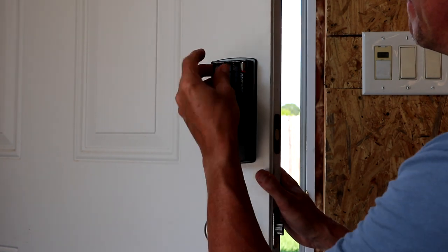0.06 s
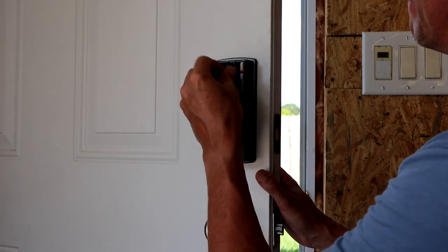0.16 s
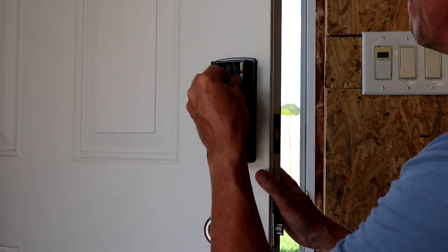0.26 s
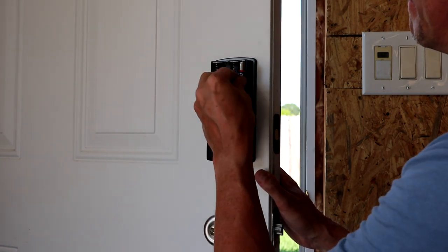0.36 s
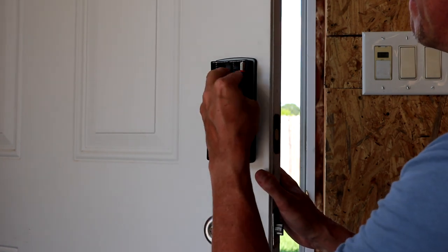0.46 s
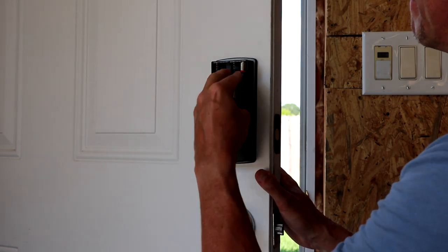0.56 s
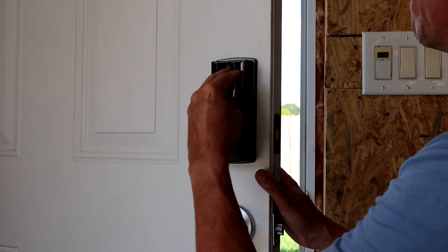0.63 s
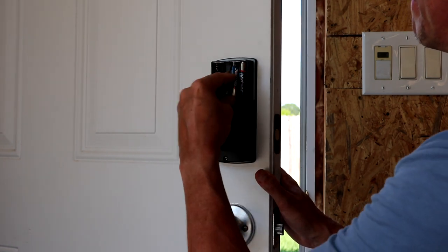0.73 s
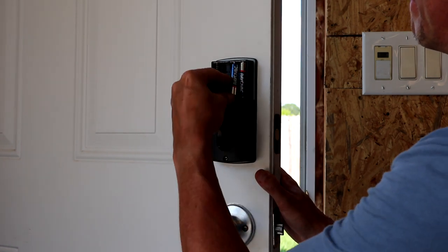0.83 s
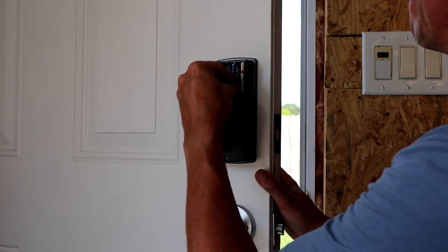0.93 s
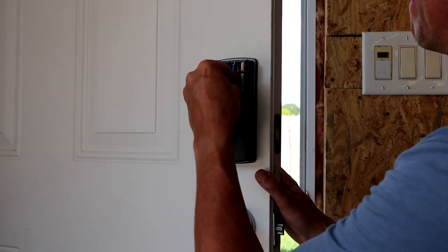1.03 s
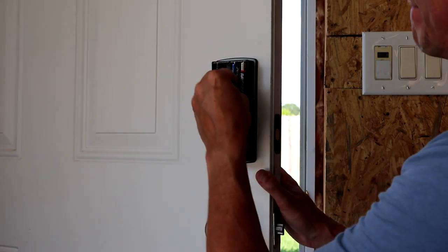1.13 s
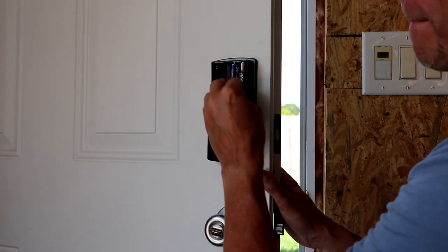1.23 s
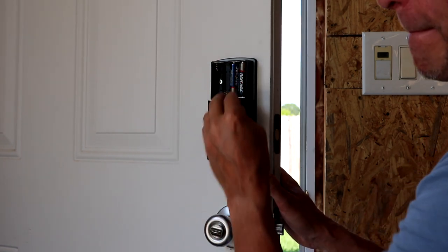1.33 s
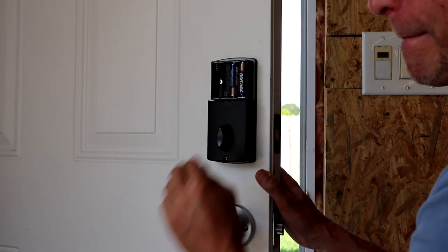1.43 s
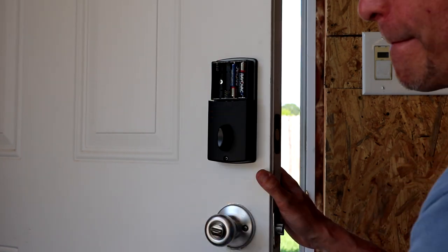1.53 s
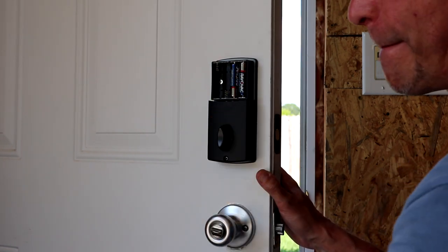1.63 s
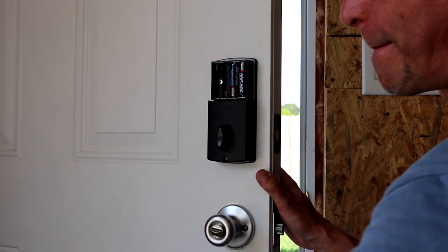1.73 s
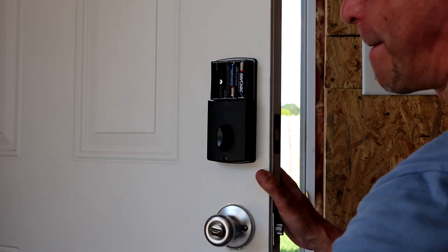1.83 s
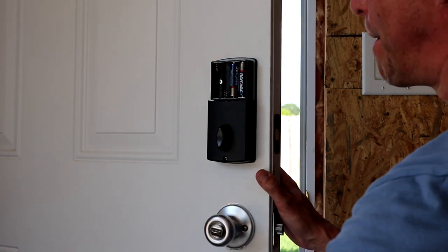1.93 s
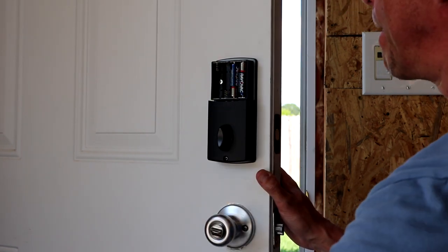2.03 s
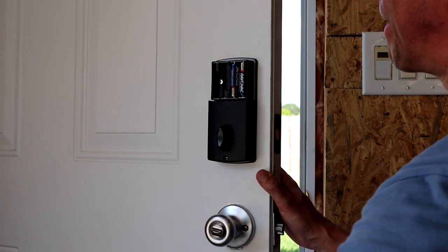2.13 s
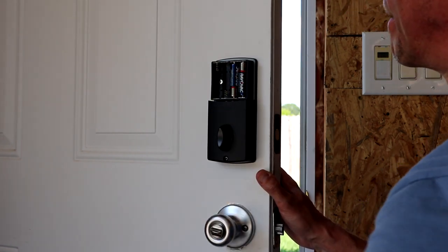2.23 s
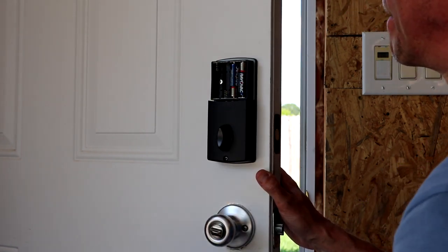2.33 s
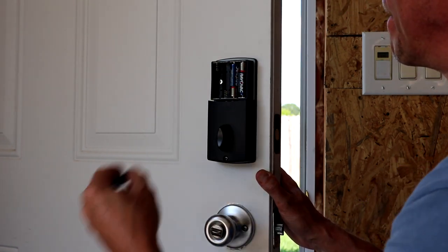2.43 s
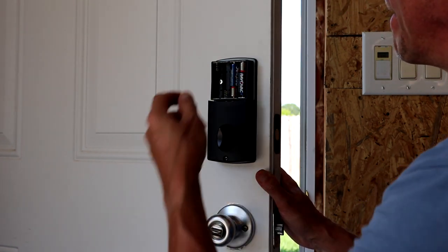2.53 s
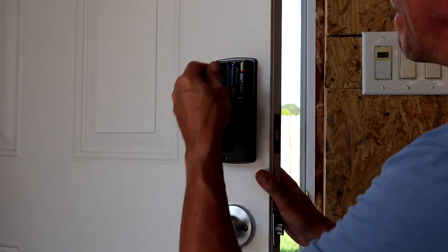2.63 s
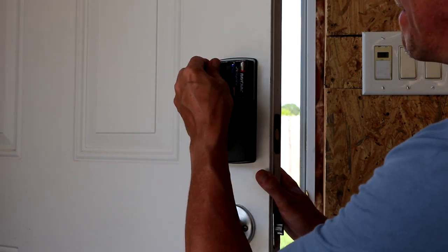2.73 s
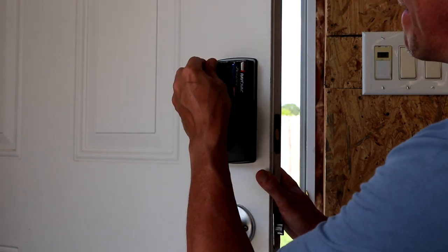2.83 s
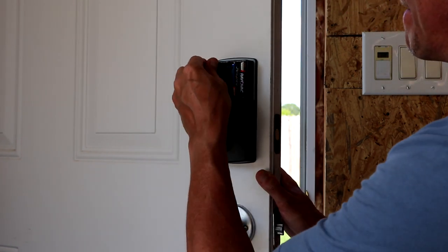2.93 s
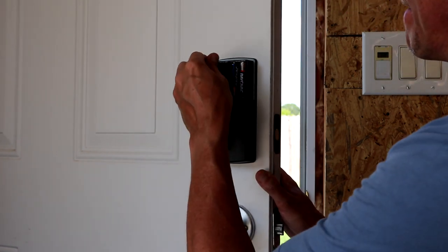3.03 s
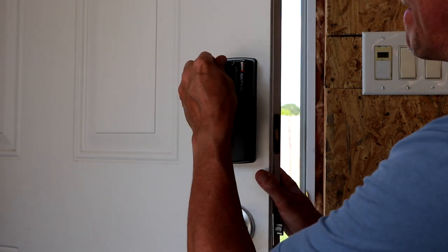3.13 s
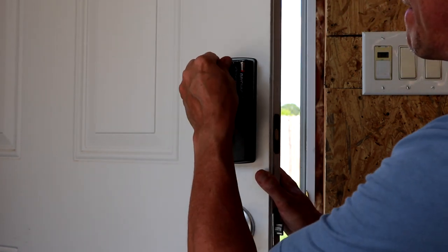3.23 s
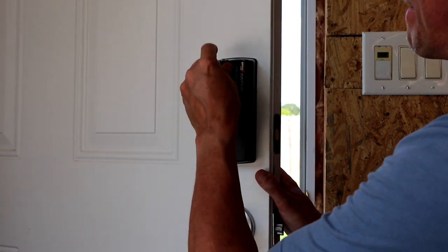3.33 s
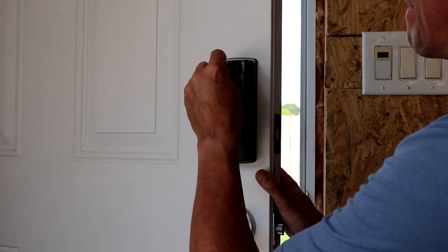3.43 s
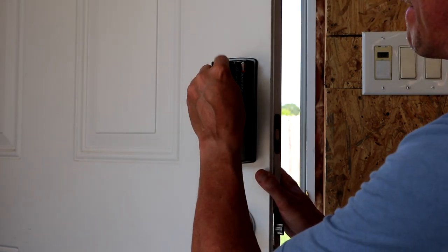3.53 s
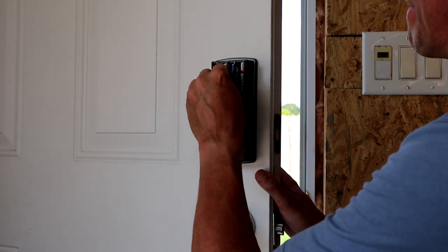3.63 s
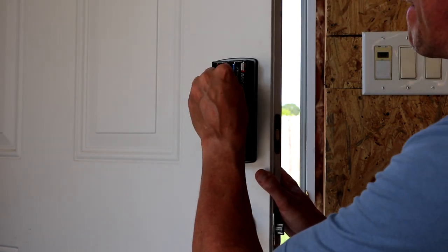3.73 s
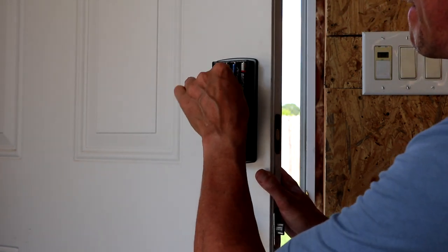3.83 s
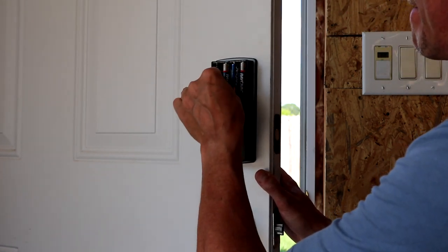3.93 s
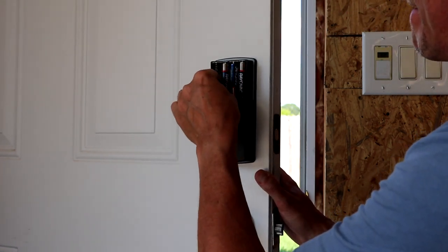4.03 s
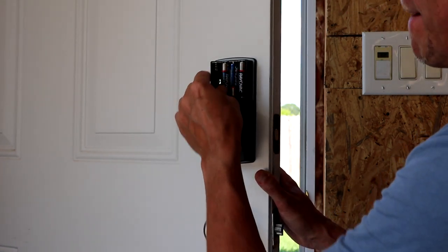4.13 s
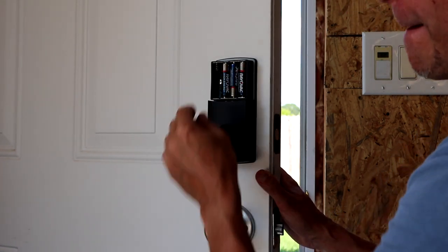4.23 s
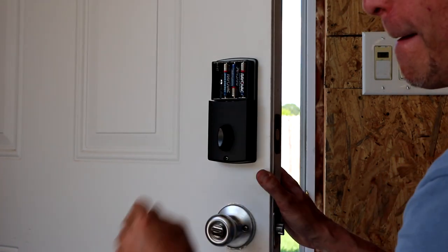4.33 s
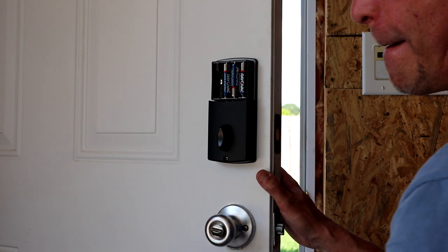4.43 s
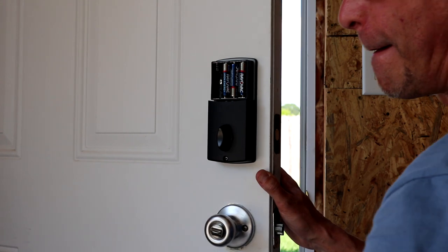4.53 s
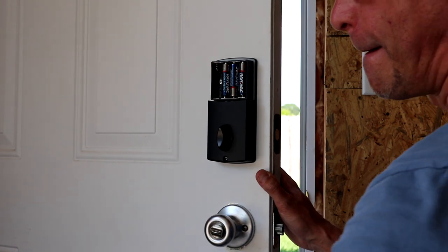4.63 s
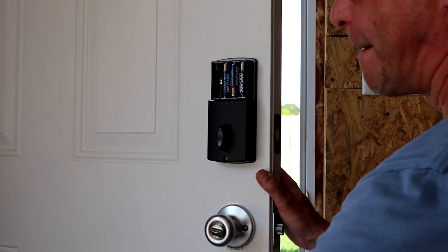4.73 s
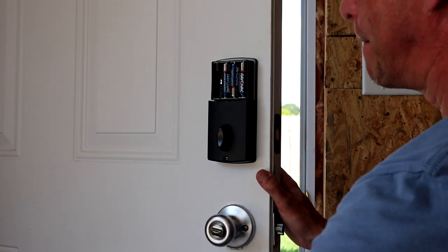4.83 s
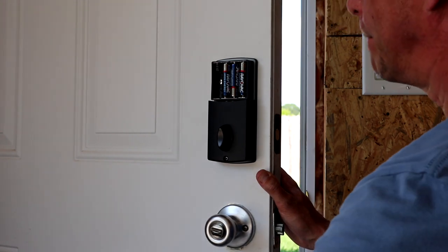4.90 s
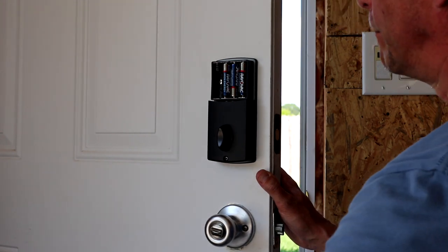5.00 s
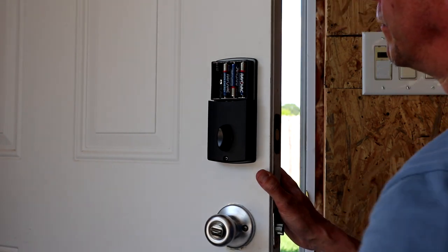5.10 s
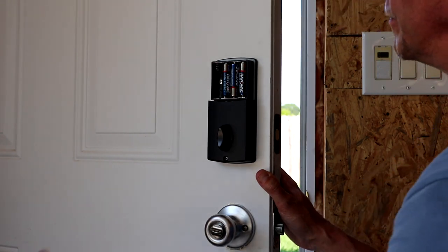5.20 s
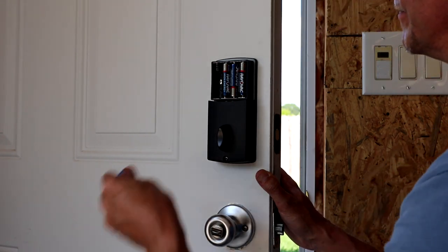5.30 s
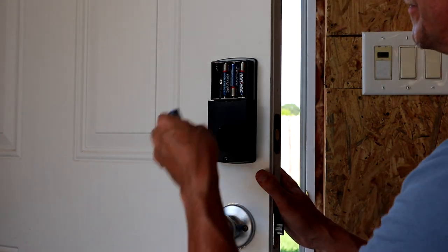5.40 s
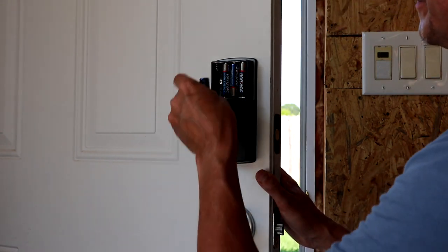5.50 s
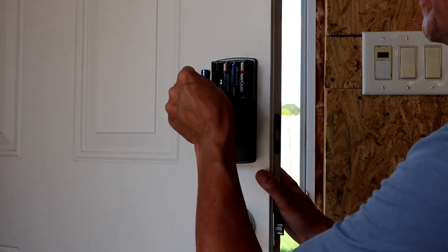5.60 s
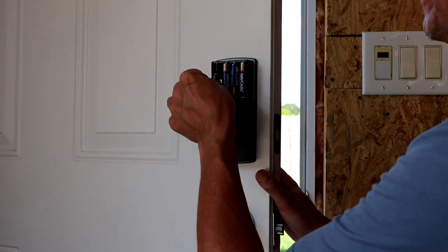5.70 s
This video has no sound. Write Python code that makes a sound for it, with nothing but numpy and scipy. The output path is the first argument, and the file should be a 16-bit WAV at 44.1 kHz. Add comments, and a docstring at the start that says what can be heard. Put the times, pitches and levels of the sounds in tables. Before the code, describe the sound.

Close, irregular clicks and clacks come from batteries being pushed into a lock's plastic housing, each knocking lightly through the door. Early on, one scrapes a contact spring and leaves a thin ring. After a few sparse taps, another snaps in with a quick flurry. Behind this are the small room's steady noise, a faint motor whine and outdoor insects, with soft birdsong and a far engine hum growing later.

```python
"""At a door standing ajar in a small room, batteries are pressed into a lock's plastic compartment.
Each impact excites the modes of housing and door, a clack and a thud, and the metal ends tick.
One battery rasps over a contact spring by stick-slip friction, and the spring rings on.
Hands bump, rub and push the door. Behind them are birds and insects outside,
a small motor's whine, a distant engine's hum and room noise."""
import sys
import numpy as np
from scipy import signal
from scipy.fft import rfft, irfft
from scipy.io import wavfile
from scipy.ndimage import uniform_filter1d

SR = 44100
rng = np.random.default_rng(int(sys.argv[2]) if len(sys.argv) > 2 else 0)


def int16_out(signal):
    """Quantize to a 16-bit WAV file."""
    q = np.round(np.clip(np.atleast_2d(signal).T, -1, 1) * 32767)
    wavfile.write(sys.argv[1], SR, q.astype(np.int16))


N = 254016

# Battery impacts; the point of contact favours the housing modes near two pitches:
# start_s, thud_db, door_t60_ratio, relative_clack_db, favoured_low_hz, favoured_high_hz, favour_db
IMPACTS = [(0.4546, -40, 0.45, -28, 1710, 3050, 10), (0.4571, -41, 0.43, -35, 1520, 1715, 12),
           (0.464, -53, .4, -35, 1715, 1770, 15), (0.486, -40.5, .5, -42, 1450, 1710, 7),
           (0.9265, -43, .5, -33.5, 1720, 1770, 11), (0.9508, -27, 0.82, -25.5, 1500, 2230, 3.9),
           (0.9565, -40, .6, -35, 2980, 3400, 7), (0.9742, -44, .6, -47, 2000, 3400, 5),
           (0.9836, -26, 0.78, -26.5, 1500, 2980, 5), (0.995, -49, .4, -34, 2950, 3030, 13),
           (1.0318, -43, .6, -32, 3010, 3320, 9), (2.0504, -39.5, .5, -41, 1900, 2350, 11),
           (2.0579, -51, .5, -34, 2330, 2400, 18), (2.8135, -34, 0.81, -34, 1950, 2190, 9.8),
           (3.203, -38.5, 0.6, -53, 1440, 1900, 6), (3.414, -45, .5, -37, 1720, 3000, 4),
           (3.4751, -42.5, .5, -33, 1440, 1530, 7.6), (3.479, -44, .4, -36, 1440, 1950, 5.6),
           (3.587, -43, .4, -39.5, 1440, 1550, 7), (3.6163, -33.5, 0.77, -28.5, 2230, 3700, 7.3),
           (3.620, -28, 0.55, -31, 1440, 2140, 6.8), (3.6245, -33, 0.6, -34, 2310, 3300, 5),
           (3.638, -36.5, 0.39, -44, 3320, 3750, 9)]
# Metal ends catching on contacts: start_s, level_db, pitch_hz, decay_s
CONTACT_TICKS = [(0.455, -44.5, 6400, .0009), (0.8738, -46, 9400, .0013), (0.9508, -24, 6500, 0.00046),
                 (0.9738, -45, 9800, .0008), (0.9836, -29.5, 6530, .0006), (1.034, -42, 6600, .001),
                 (2.8133, -47, 6500, .001), (3.208, -54, 8400, .004), (3.4751, -46, 7200, .0014),
                 (3.5592, -42, 7300, .0009), (3.6055, -41, 8900, .0007), (3.6163, -34, 7250, 0.00053),
                 (3.622, -46, 5800, .003), (3.6415, -46, 5700, .0012), (3.8977, -41.5, 6600, .0007),
                 (4.2851, -46, 7940, .004)]
# Modes of the door, the housing and the spring: frequency_hz, relative_db, t60_s
DOOR_MODES = [(146, -10, 0.13), (207, -17.5, 0.15), (346, -5.5, 0.091), (393, -8, 0.09), (486, -4.5, 0.17),
              (563, -4, 0.092), (714, 2.5, 0.036), (848, -1.5, 0.031), (1000, 1.5, 0.044), (1039, 1, 0.05),
              (1155, 0, 0.029)]
HOUSING_MODES = [(1440, -1, 0.019), (1560, -5.5, 0.029), (1706, -2, 0.035), (1978, -1.5, 0.032),
                 (2170, -3, 0.031), (2286, -3.5, 0.028), (2444, -9.5, 0.04), (2735, -5.5, 0.027),
                 (2900, -3.5, 0.03), (3020, -7, 0.027), (3320, -5, 0.024), (3420, -9.5, 0.031),
                 (3745, -14, 0.035)]
SPRING_MODES = [(1810, -12.5, 0.14), (1970, -19, .15), (2360, -27, 0.13), (2595, -20, .2),
                (2990, -9.5, 0.06), (3130, -14, .09), (3380, -15, 0.064), (3690, -20.5, 1.5),
                (3850, -14.5, .08), (6380, -19.5, 0.2), (6470, -29, 2.0), (6780, -30.5, 1.7),
                (7750, -29, .35), (8220, -28, 0.6), (8570, -29.5, 1.14)]
# Spectra of a tick and of the rasp on the coil: frequency_hz, gain_db
TICK_SPECTRUM = [(2500, -20), (4600, -15), (6000, -1.5), (8500, -9), (10000, -11.5), (12000, -24),
                 (15500, -40)]
RASP_SPECTRUM = [(200, 1), (1000, -6), (2500, 0.5), (3100, 8.5), (3850, -1), (4500, -14), (5700, -8),
                 (6500, -5), (8600, -9), (10000, -16), (15500, -30)]
# Soft bumps of a hand on the door: start_s, relative_db, pitch_hz
HAND_BUMPS = [(1.970, -35.5, 245), (5.0455, -33, 195), (5.075, -40, 504)]
# Hand and battery rubbing on plastic: start_s, rise_s, decay_s, level_db, pitch_hz
PLASTIC_RUBS = [(2.036, 0.016, 0.0091, -42, 2300), (2.044, 0.019, .012, -56, 3930),
                (3.572, 0.014, 0.0032, -36, 1360), (3.62, 0.0062, 0.062, -46, 3620)]
# The door giving under a firm push: start_s, level_db
DOOR_PUSHES = [(0.469, -43), (3.579, -38.5)]
# First bird, a whistle that scoops up and sags: start_s, level_db, top_pitch_hz
BIRD_WHISTLES = [(-.05, -48, 2654), (4.235, -50.5, 2675), (4.525, -48, 2640), (4.814, -46, 2644)]
# Second bird, a steep chip and a settling peep: start_s, chip_db, peep_delay_s, peep_db, peep_hz
BIRD_CALLS = [(4.726, -68, .065, -50.5, 3820), (4.959, -62.5, 0.125, -50, 3810),
              (5.201, -63, 0.078, -50, 3842), (5.449, -65, 0.079, -52, 3845)]
# Third bird, rising notes, buzzy or pure: start_s, length_s, level_db, pitch_hz, buzz_depth_hz
BIRD_BUZZES = [(3.93, 0.14, -50, 3200, 94), (4.103, 0.28, -56, 3240, 98), (4.25, 0.2, -56.5, 3165, 14),
               (4.4, 0.066, -51, 3194, 10), (4.412, 0.228, -56, 3340, 24), (4.469, 0.26, -59.5, 3386, 90)]
# Thin, high bird notes: start_s, level_db, pitch_hz
BIRD_THIN_NOTES = [(3.345, -67.5, 5440), (3.81, -63.5, 5450), (5.715, -63.5, 6330)]
# Bands of the motor and of a far insect chorus: centre_hz, width_hz, above_room_noise_db
MOTOR_BANDS = [(490.6, 4.2, 2.5), (515, 11, 0.5), (1056, 3.9, 4), (1722, 3.3, 20.5), (1748, 8.7, 15),
               (1772, 4.4, 17), (1920, 7.5, 10), (1946, 6, 12), (2021, 37, 8.5), (2075, 8.9, 13.5),
               (2074, 45, 6.5), (2340, 5.8, 12.5), (3010, 78, 5.5)]
INSECT_BANDS = [(9720, 690, 18.5), (11920, 840, 7)]
# Harmonics of the distant engine: time_s, firing_db, octave_db
ENGINE_LEVELS = [(0.3, -64, -71), (1.85, -53, -63), (3.95, -54, -51), (4.56, -46.5, -64),
                 (4.85, -46.5, -60), (5.25, -42, -53), (5.316, -43, -55), (5.68, -47, -53)]
# Spectral density of the room noise: frequency_hz, density_db_per_hz
ROOM_NOISE = [(14, -93), (27, -67), (39, -71.5), (56, -62), (85, -70.5), (400, -76), (900, -76.5),
              (1400, -81.5), (1950, -77.5), (2500, -85.5), (4000, -91), (5400, -99), (6600, -111),
              (8500, -117), (11000, -118), (15000, -135)]
# Reverberation times indoors and outdoors: frequency_hz, t60_s
ROOM_DECAY = [(150, 0.79), (600, 0.18), (3000, 0.5), (7000, 0.21), (14000, 0.21)]
YARD_DECAY = [(2500, 0.44), (3800, 0.66), (5500, 0.5), (7000, 0.57)]
# Likeness of the noise at the left and right microphone ports: frequency_hz, coherence_ratio
PORT_COHERENCE = [(60, .999), (130, 0.98), (290, 0.91), (640, 0.91), (1410, 0.38), (1750, 0.41),
                  (2100, 0.23), (4000, 0.9), (7000, 1)]
# Level balance of the ports: frequency_hz, left_minus_right_db
PORT_BALANCE = [(200, 0), (380, -1), (700, 3.5), (1300, 1.5), (1800, 7), (2400, 3), (4400, 0.5), (8000, 0)]
# Phase between the ports: frequency_hz, left_lead_rad
PORT_PHASE = [(60, 0), (500, 0.44), (1290, -0.36), (1750, 0.56), (2070, 1.86), (2330, .5), (3010, 2.5),
              (4500, 2.5)]


def batteries(rebound_s=0.016):
    """Inelastic collision: each battery strikes and rebounds once, more weakly; its metal ends tick."""
    out = np.zeros((2, N))
    for start, thud_db, t60_ratio, clack_db, *favoured_hz, favour_db in IMPACTS:
        add(out, start, impact(thud_db, t60_ratio, clack_db, favoured_hz, favour_db))
        add(out, start + rebound_s, impact(thud_db - 13.5, t60_ratio, clack_db - 15, favoured_hz, favour_db))
    for start, db, hz, decay in CONTACT_TICKS:
        add(out, start, tick(db, hz, decay))
    return out


def impact(thud_db, t60_ratio, clack_db, favoured_hz, favour_db):
    """Impulse excitation: the light housing clacks in short, high modes; the heavier door thuds."""
    t = np.arange(SR // 4) / SR
    grit = diffuse(rng.standard_normal((2, len(t)))) * np.exp(-t / 0.0052)
    dense_modes = colour(grit, [(300, -15.5), (1200, 4.5), (2200, -3), (3600, -8), (4600, -15),
                                (10000, -44), (15500, -64)])
    housing_modes = []
    for hz, db, t60 in HOUSING_MODES:
        nearness = np.exp(-(np.log(hz / np.array(favoured_hz)) / 0.086) ** 2).max()
        housing_modes.append((hz, db + favour_db * nearness, t60))
    housing = ring(housing_modes, t, spread_db=1.3, apart_hz=5000) * (1 - np.exp(-(t / 0.00041) ** 2))
    clack = with_energy(housing, 0.0081) + amp(-4.5) * with_energy(dense_modes, 0.006)
    door_modes = [(hz, db, t60 * t60_ratio) for hz, db, t60 in DOOR_MODES]  # a firm grip damps the door
    door = ring(door_modes, t, spread_db=2.5, apart_hz=4000) * (1 - np.exp(-t / 0.0013))
    return amp(thud_db) * with_energy(door, 0.0081) + amp(clack_db - 2.5) * clack


def ring(modes, t, spread_db, apart_hz):
    """Modal superposition: damped sinusoids whose strengths vary with the point of contact."""
    hz, db, t60 = np.transpose(modes)[:, :, None]
    strength, detune, skew, sign = rng.standard_normal((4, len(modes), 1))
    # high modes reach the two ports out of step
    phase = skew * np.minimum(hz / apart_hz, 1.2) * np.array([1, -1])[:, None, None]
    waves = np.sign(sign) * np.sin(2 * np.pi * hz * (1 + 0.0038 * detune) * t + phase)
    return (waves * amp(db + spread_db * strength - 60 * t / t60)).sum(1)


def tick(level_db, pitch_hz, decay_s, half_width_hz=600, after_ring_s=0.013):
    """Resonance: metal catching on a contact gives a gritty snap with a pitch of its own."""
    t = np.arange(SR // 10) / SR
    grit = diffuse(rng.standard_normal((2, len(t))), split_hz=3800)
    envelope = np.exp(-t / decay_s) + amp(-20) * np.exp(-t / after_ring_s)
    hz = np.fft.rfftfreq(512, 1 / SR)
    resonance_db = 9 / (1 + ((hz - pitch_hz) / half_width_hz) ** 2)
    spectrum = np.transpose([hz, read(TICK_SPECTRUM, hz) + resonance_db])
    return amp(level_db) * with_energy(colour(grit * envelope, spectrum), 0.00048)


def spring(start_s=1.0305, slide_s=0.026, attack_s=0.0025, release_db_per_s=800):
    """Stick-slip friction: a battery rasps over the coil and drives its modes, which ring on."""
    chatter_hz, chatter_db, slips_per_s = 450, 3.5, 4000
    t = np.arange(N) / SR
    since = t - start_s
    force = np.clip(since / attack_s, 0, 1) * amp(-release_db_per_s * np.clip(since - slide_s, 0, 1))
    catches = np.arange(0, t[-1], 1 / chatter_hz)  # the battery catches on the turns of the coil
    force *= amp(chatter_db * np.interp(t, catches, rng.standard_normal(N)[:len(catches)]))
    slips = rng.choice([-1, 1], (2, N)) * (rng.random(N) < slips_per_s / SR)
    rasp = unit_rms(colour(diffuse(slips, split_hz=2800), RASP_SPECTRUM)) * force
    wire = np.zeros((2, N))
    noise = rfft(rng.standard_normal((2, N)))
    bin_hz = np.fft.rfftfreq(N, 1 / SR)
    for (hz, db, t60), skew in zip(SPRING_MODES, rng.uniform(-1.3, 1, len(SPRING_MODES))):
        driven = force * unit_rms(np.sin(2 * np.pi * hz * t + 1.1 * skew * np.array([[1], [-1]])))
        retention = amp(-60 / (t60 * SR)) ** 2
        energy = signal.lfilter([1], [1, -retention], force ** 2 + 1e-30)  # slips pile up in the mode
        half_width_hz = 34 * (hz / 3000) ** 2  # left to itself, each mode rings as a close cluster
        cluster = 1 / (1 + ((bin_hz - hz) / half_width_hz) ** 4)
        shimmer = np.sqrt(energy / energy.max()) * unit_rms(irfft(noise * cluster))
        wire += amp(db) * (driven + amp(-3) * shimmer)
    return amp(-28.5) * (amp(-6) * rasp + amp(-2.5) * wire)


def hands():
    """Soft impact and friction: hands bump the door, rub over plastic and push the door on its hinges."""
    out = np.zeros((2, N))
    for start, db, hz in HAND_BUMPS:
        add(out, start, bump(db, hz))
    for start, rise, decay, db, hz in PLASTIC_RUBS:
        hiss = soft_contact(db, hz, octaves=0.58, rise_s=rise, decay_s=decay)
        scuff = soft_contact(db - 3.5, pitch_hz=730, octaves=1.26, rise_s=rise, decay_s=0.016)
        add(out, start, hiss + scuff)
    for start, db in DOOR_PUSHES:
        add(out, start, soft_contact(db, pitch_hz=101, octaves=0.84, rise_s=0.018, decay_s=0.059))
    return out


def bump(db, pitch_hz, rise_s=0.0024, t60_s=0.11):
    """Damped panel vibration: the door booms under a hand's dull thump and the slap of its skin."""
    t = np.arange(SR // 3) / SR
    thump = soft_contact(db - 3.5, pitch_hz, octaves=1, rise_s=rise_s, decay_s=0.016)
    slap = soft_contact(db - 3.5, pitch_hz=960, octaves=1.19, rise_s=rise_s, decay_s=0.017)
    settling_hz = pitch_hz * (1 + 0.556 * np.exp(-t / 0.012))
    envelope = np.minimum(t / rise_s, 1) * amp(-60 * t / t60_s)
    boom = np.sin(2 * np.pi * np.cumsum(settling_hz) / SR) * envelope
    return thump + slap + amp(db - 1.5) * with_energy(np.array([boom, boom]), 0.01)


def soft_contact(level_db, pitch_hz, octaves, rise_s, decay_s):
    """Band-limited excitation: soft contact gives a ringless swell of noise with no top treble."""
    t = np.arange(SR // 3) / SR
    hz = np.fft.rfftfreq(len(t), 1 / SR) + 1
    band = 1 / (1 + (np.log2(hz / pitch_hz) / octaves) ** 4) / (1 + (hz / 7000) ** 4)
    body = irfft(rfft(diffuse(rng.standard_normal((2, len(t))))) * band, len(t))
    swell = np.minimum(t / rise_s, 1) * np.exp(-np.maximum(t - rise_s, 0) / decay_s)
    taper = 1 - (t / t[-1]) ** 4
    return amp(level_db) * with_energy(body * swell * taper, rise_s / 3 + decay_s / 2)


def birds(chip_s=0.022, chip_hz=6580, chip_fall_hz_per_s=61000, climb_hz_per_s=180):
    """Frequency glides: four kinds of song outside, each repeating its own pitch contour."""
    out = np.zeros((2, N))
    for start, db, hz in BIRD_WHISTLES:
        add(out, start, bird_note(0.119, hz - 133.4, hz, hz - 75, db))
    sweep = chip_fall_hz_per_s * chip_s / 2
    for start, chip_db, delay, peep_db, hz in BIRD_CALLS:
        add(out, start, bird_note(chip_s, chip_hz + sweep, chip_hz, chip_hz - sweep, chip_db))
        add(out, start + delay, bird_note(0.158, hz + 78.6, hz, hz, peep_db, depth_hz=22))
    for start, length, db, hz, depth_hz in BIRD_BUZZES:
        climb = climb_hz_per_s * length / 2
        add(out, start, bird_note(length, hz - climb, hz, hz + climb, db, depth_hz))
    for start, db, hz in BIRD_THIN_NOTES:
        add(out, start, bird_note(0.054, hz + 35, hz, hz - 35, db))
    return out


def bird_note(length_s, start_hz, middle_hz, end_hz, level_db, depth_hz=2, rate_hz=60):
    """Frequency modulation: a gliding whistle in the yard trembles if it is shallow, buzzes if deep."""
    t = np.arange(round(length_s * SR)) / SR
    position = 2 * t / t[-1] - 1
    first_half = middle_hz + (start_hz - middle_hz) * abs(position) ** 1.42
    second_half = middle_hz + (end_hz - middle_hz) * position
    glide = np.where(position < 0, first_half, second_half)
    wobble = unit_rms(uniform_filter1d(rng.standard_normal(SR), size=200))[:len(t)]
    buzz = depth_hz * np.sin(2 * np.pi * rate_hz * t)
    hz = glide + buzz + (0.0021 * middle_hz + 0.4 * depth_hz) * wobble
    note = np.sin(2 * np.pi * np.cumsum(hz) / SR) * signal.windows.tukey(len(t), 0.8)
    heard = signal.fftconvolve(note[None], yard_path(middle_hz), axes=1)
    return amp(level_db) * with_energy(heard, length_s)


def yard_path(pitch_hz, wall_delay_s=0.15, loss_db_per_octave=6):
    """Multipath propagation: direct sound, the yard's blur and one late echo from a wall."""
    path = amp(4.5) * reverberation(YARD_DECAY, 0.7)
    path[:, round(wall_delay_s * SR)] += amp(-14)
    path *= amp(-loss_db_per_octave * np.log2(pitch_hz / 2660))  # foliage absorbs high notes' echoes
    path[:, 0] += 1  # the direct sound through the gap of the door
    return path


def twitter(start_s=4.65, rise_s=0.25, centre_hz=6170, width_hz=440):
    """Incoherent summation: birds too far off to tell apart merge into a faint, high haze."""
    band = bands([(centre_hz, width_hz, 0)], np.fft.rfftfreq(N, 1 / SR))
    swell = np.clip((np.arange(N) / SR - start_s) / rise_s, 0, 1)
    return amp(-76) * swell * unit_rms(irfft(rfft(rng.standard_normal((2, N))) * band, N))


def motor(fade_db_per_s2=0.1):
    """Narrow-band noise: a small motor's whine wavers about fixed pitches and fades ever faster."""
    hz = np.fft.rfftfreq(N, 1 / SR)
    whine = irfft(port_noise() * amp(read(ROOM_NOISE, hz)) * bands(MOTOR_BANDS, hz), N)
    return amp(-fade_db_per_s2 * (np.arange(N) / SR) ** 2) * whine


def engine(firing_hz=102.64):
    """Periodic firing: a far engine hums at its wandering firing rate, the octave and half orders."""
    t = np.arange(N) / SR
    times, firing_db, octave_db = np.transpose(ENGINE_LEVELS)
    wander = unit_rms(sum(np.sin(2 * np.pi * (hz * t + rng.random())) for hz in np.geomspace(0.3, 7, 12)))
    angle = 2 * np.pi * np.cumsum(firing_hz * (1 + 0.0055 * wander)) / SR
    firing = amp(np.interp(t, times, firing_db))
    octave = amp(np.interp(t, times, octave_db))
    crank = amp(-10.5) * firing * np.sin(angle / 2) + amp(-56.5) * np.sin(1.5 * angle)
    return np.sqrt(2) * (firing * np.sin(angle) + octave * np.sin(2 * angle) + crank)


def room_noise_and_insects():
    """Power addition: steady room noise and a far, even insect chorus share one spectrum."""
    hz = np.fft.rfftfreq(N, 1 / SR)
    return irfft(port_noise() * amp(read(ROOM_NOISE, hz)) * np.hypot(1, bands(INSECT_BANDS, hz)), N)


def port_noise():
    """Partial coherence: the spectrum of white noise at two ports, its midrange leaning left."""
    hz = np.fft.rfftfreq(N, 1 / SR)
    left, unrelated = rfft(rng.standard_normal((2, N))) * np.sqrt(SR / 2)
    coherence = np.clip(read(PORT_COHERENCE, hz), -1, 1)
    lag = np.exp(-1j * read(PORT_PHASE, hz))
    right = (coherence * left + np.sqrt(1 - coherence ** 2) * unrelated) * lag
    lean = amp(read(PORT_BALANCE, hz) / 2)
    return np.array([left * lean, right / lean])


def reverberation(decay_table, seconds):
    """Exponential decay: a stereo tail of unit mean energy, each band dying at its own rate."""
    count = round(seconds * SR)
    hz, t, spectra = signal.stft(diffuse(rng.standard_normal((2, count))), SR, nperseg=256)
    decay = amp(-60 * t / read(decay_table, hz)[:, None])
    tail = signal.istft(spectra * decay, SR, nperseg=256)[1][:, :count]
    tail *= 1 - np.exp(-(np.arange(count) / SR / 0.0034) ** 2)
    return with_energy(tail, 1 / SR)


def diffuse(x, split_hz=1500):
    """Diffuse field: two unrelated signals reach close ports alike in the bass, apart in the treble."""
    mid, side = rfft(x)
    hz = np.fft.rfftfreq(x.shape[1], 1 / SR)
    apart = hz / np.hypot(hz, split_hz)
    return irfft(np.array([mid + apart * side, mid - apart * side]) / np.sqrt(1 + apart ** 2), x.shape[1])


def colour(x, spectrum, size=1024):
    """Minimum-phase filtering: a causal response with the given (frequency_hz, gain_db) spectrum."""
    log_gain = np.log(amp(read(spectrum, abs(np.fft.fftfreq(size, 1 / SR)))))
    taps = np.fft.ifft(np.exp(np.conj(signal.hilbert(log_gain)))).real
    return signal.fftconvolve(x, taps[None], axes=1)[:, :x.shape[1]]


def bands(table, hz):
    """Parallel resonances: the gain of steep-sided bands added in power."""
    return np.sqrt(sum(amp(db) ** 2 / (1 + ((hz - centre) / (0.56 * width)) ** 4)
                       for centre, width, db in table))


def read(points, hz):
    """Interpolation of a table on a log-frequency axis."""
    table_hz, values = np.transpose(points)
    return np.interp(np.log(hz + 1), np.log(table_hz + 1), values)


def add(mix, start_s, sound):
    """Superposition of a stereo sound on the mix."""
    start = round(start_s * SR)
    sound = sound[:, max(-start, 0):]
    part = mix[:, max(start, 0):][:, :sound.shape[1]]
    part += sound[:, :part.shape[1]]


def amp(db):
    """Amplitude ratio of a level in decibels."""
    return 10 ** (np.asarray(db) / 20)


def unit_rms(x):
    """Power normalisation to rms 1."""
    return x / np.sqrt(np.mean(x ** 2) + 1e-20)


def with_energy(x, seconds):
    """Energy normalisation of a stereo sound to that of rms 1 held for this long."""
    return x * np.sqrt(2 * seconds * SR / (np.sum(x ** 2) + 1e-20))


def scene():
    """Direct and reverberant fields: the lock and hands sound in a small room, the background behind."""
    near = (batteries() + hands() + spring()) * amp([[0.5], [-0.5]])
    room = signal.fftconvolve(near, reverberation(ROOM_DECAY, 0.4), axes=1)[:, :N]
    return near + amp(-7.5) * room + birds() + twitter() + room_noise_and_insects() + motor() + engine()


def record(dry, cutoff_hz=15800):
    """Band limiting: a steep low-pass filter removes the highest treble."""
    taps = signal.firwin(511, cutoff_hz, window=("kaiser", 9), fs=SR)
    return signal.oaconvolve(dry, taps[None], "same", axes=1)


dry = scene()
out = record(dry)
int16_out(out)
```